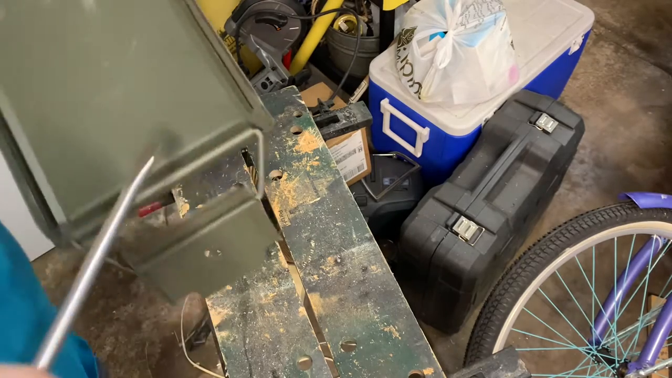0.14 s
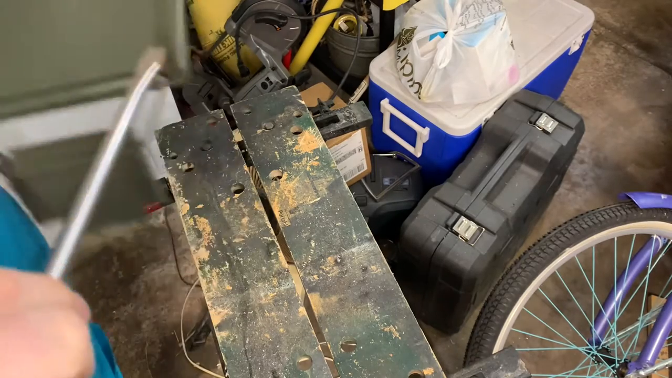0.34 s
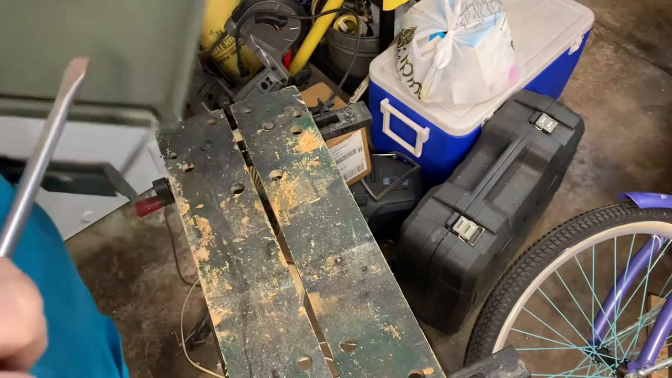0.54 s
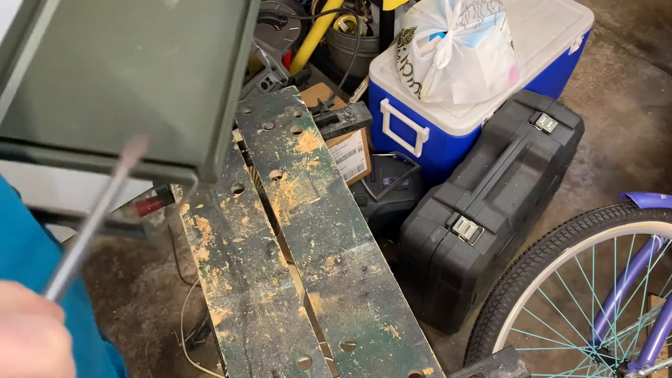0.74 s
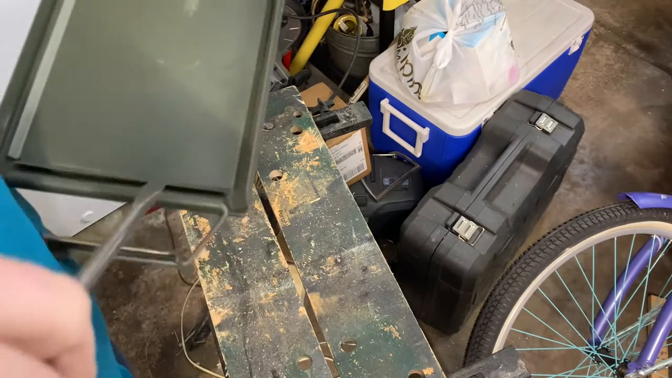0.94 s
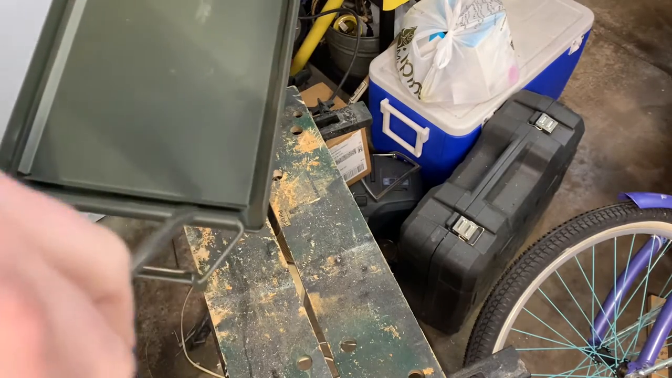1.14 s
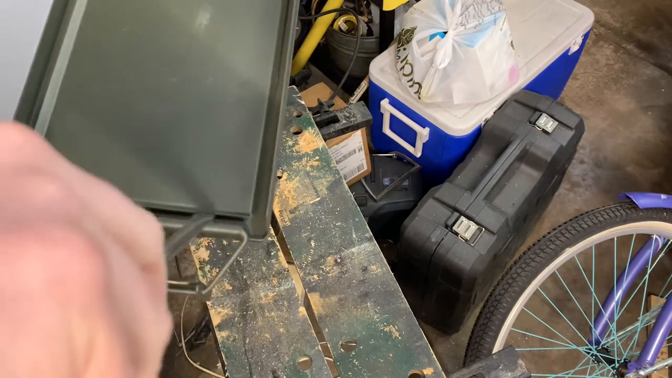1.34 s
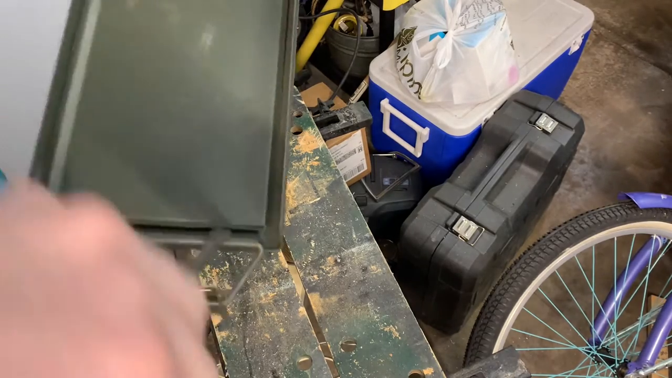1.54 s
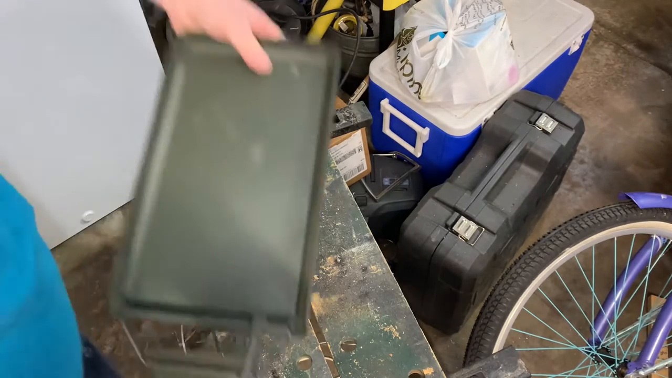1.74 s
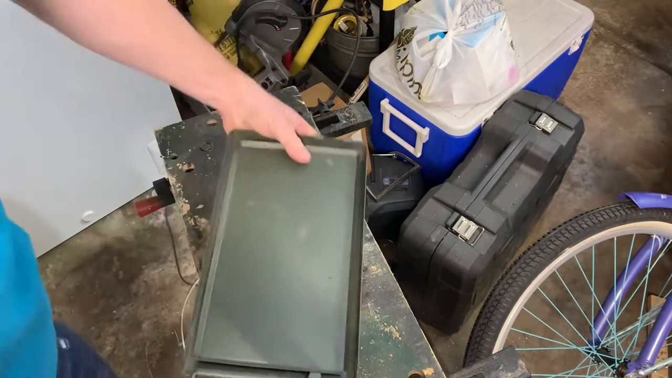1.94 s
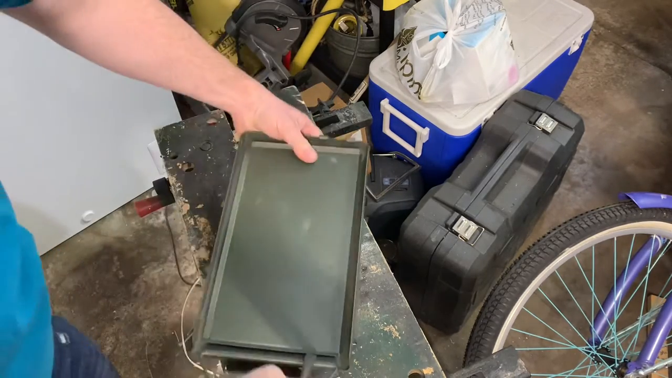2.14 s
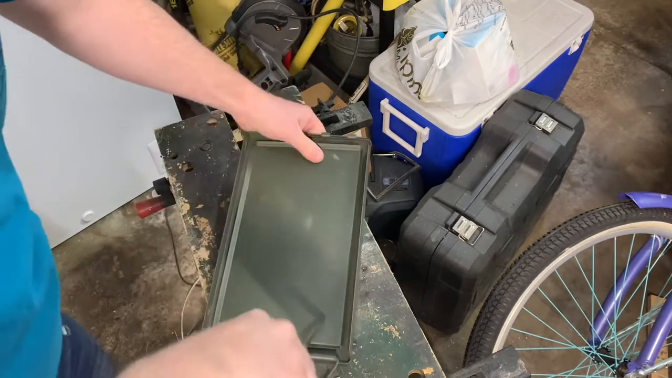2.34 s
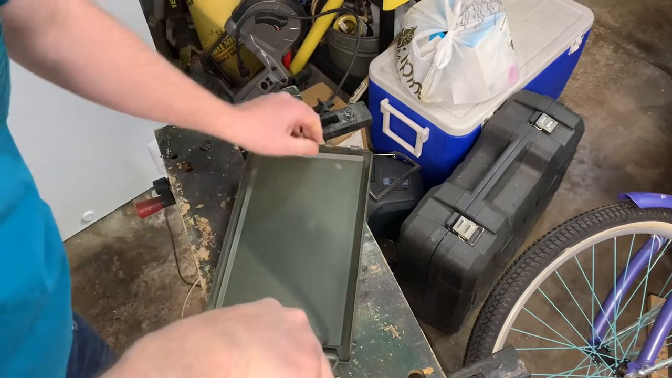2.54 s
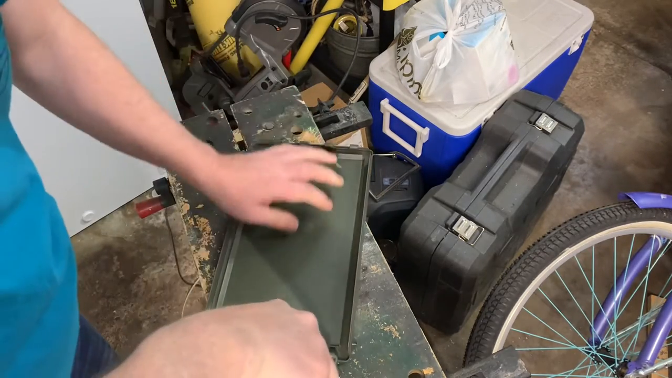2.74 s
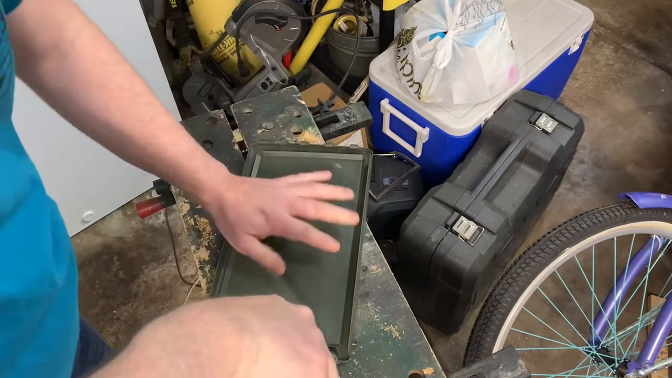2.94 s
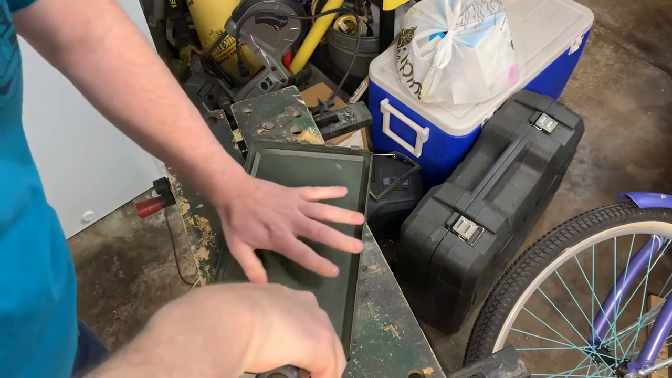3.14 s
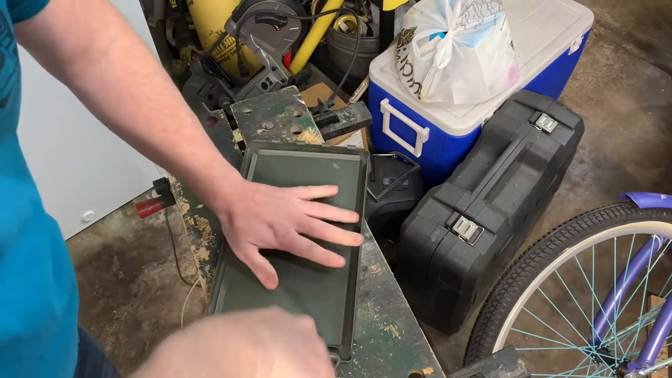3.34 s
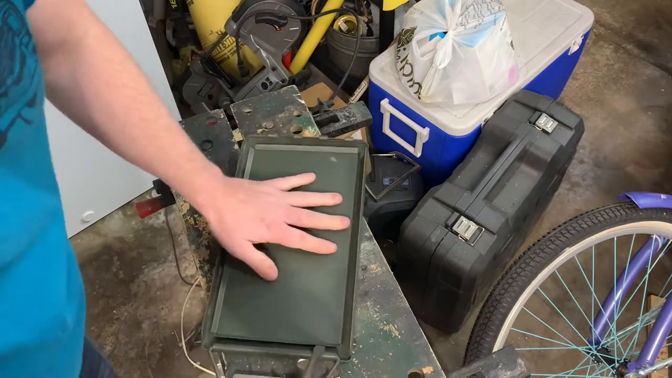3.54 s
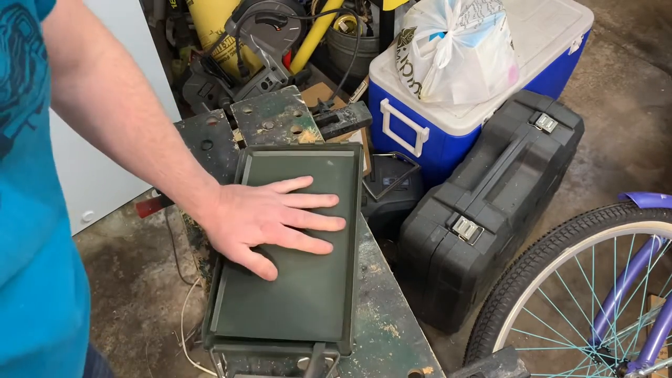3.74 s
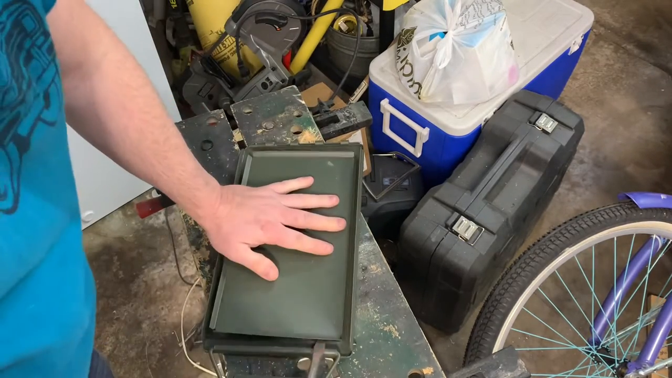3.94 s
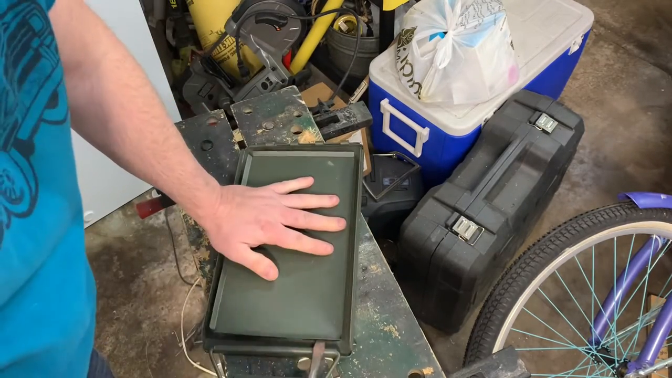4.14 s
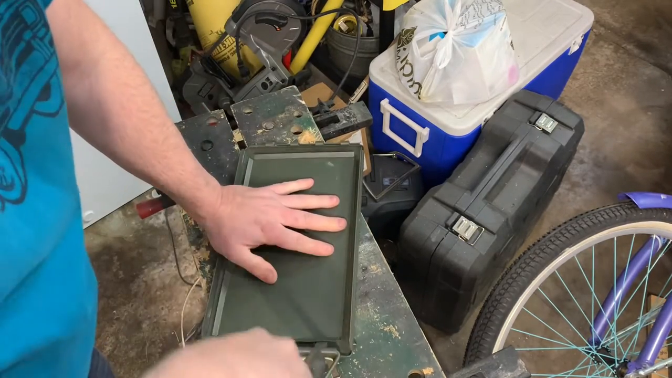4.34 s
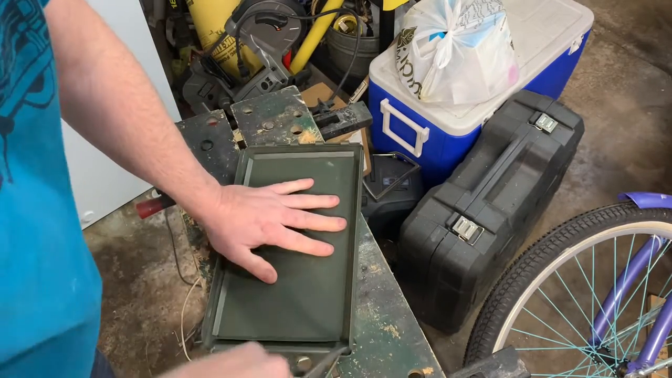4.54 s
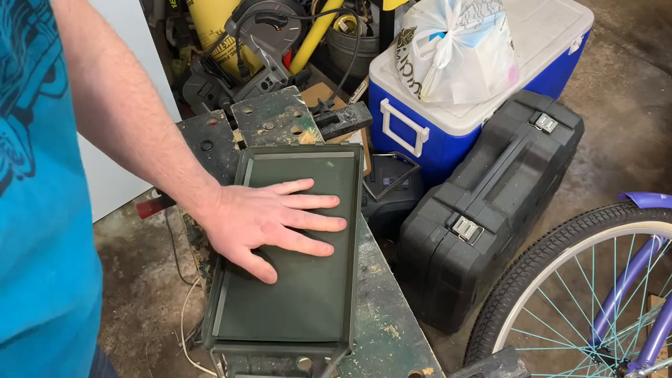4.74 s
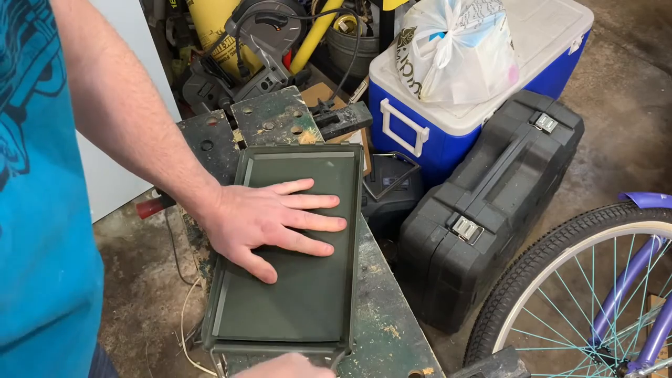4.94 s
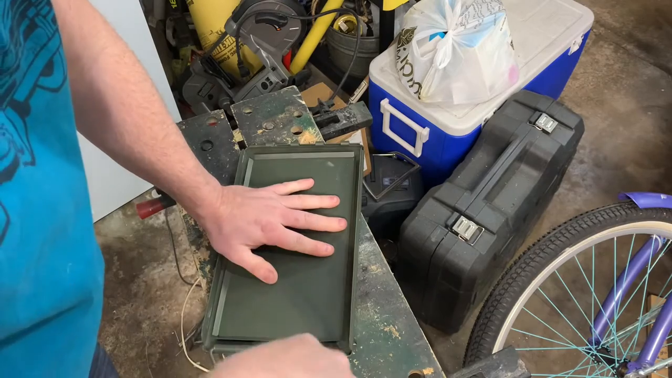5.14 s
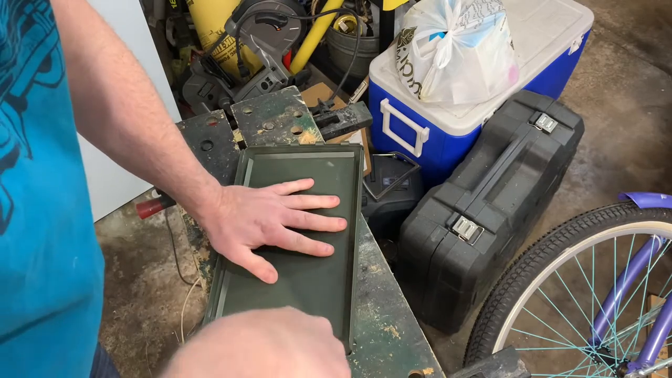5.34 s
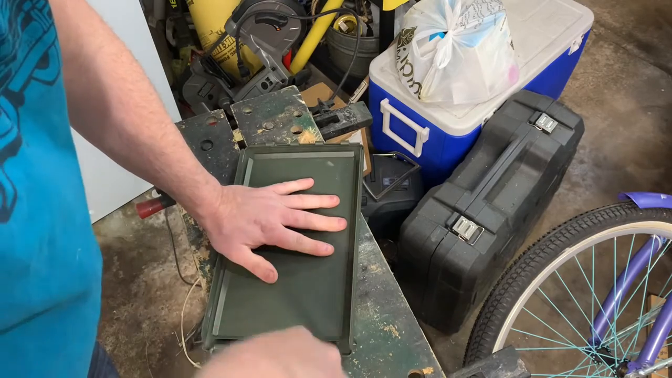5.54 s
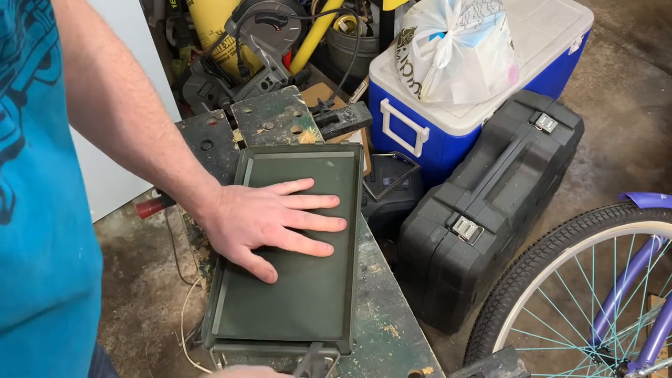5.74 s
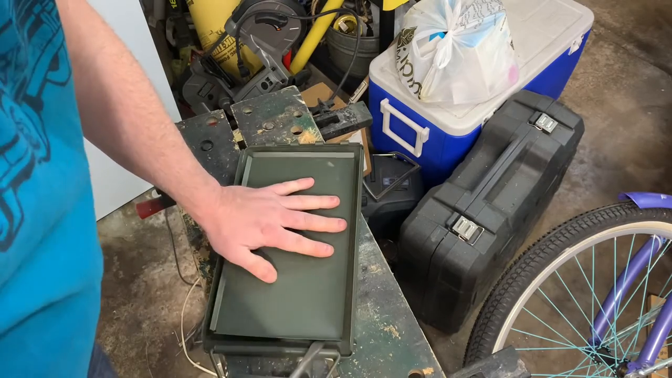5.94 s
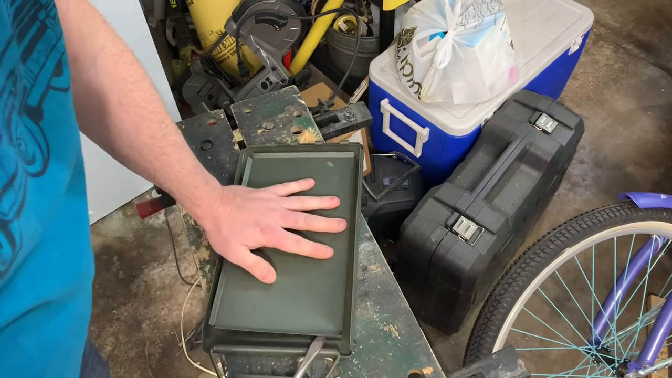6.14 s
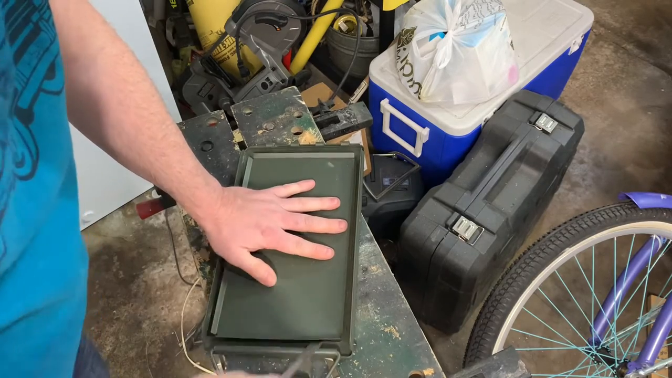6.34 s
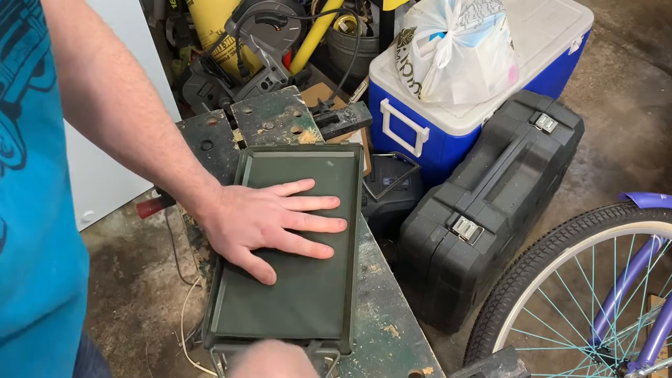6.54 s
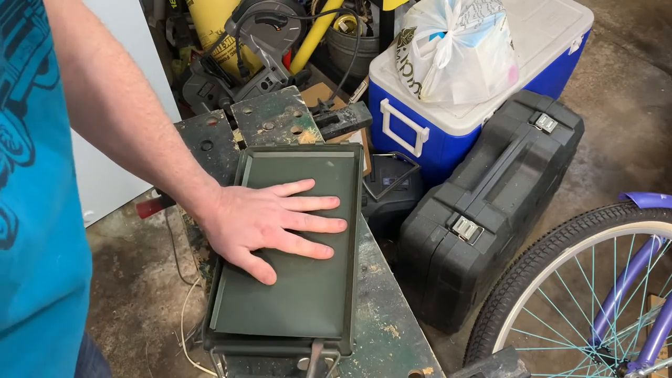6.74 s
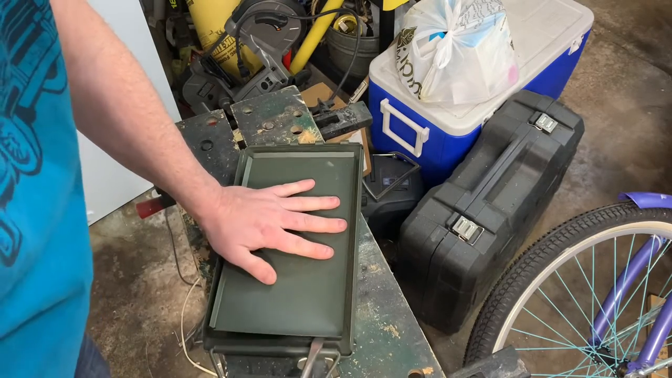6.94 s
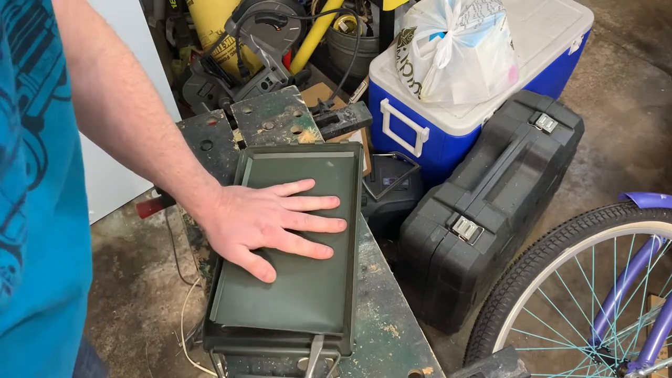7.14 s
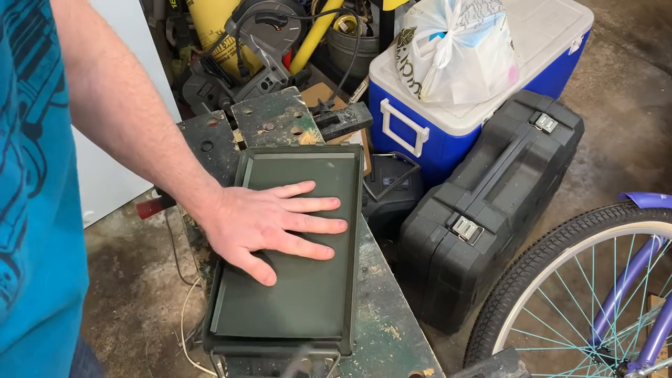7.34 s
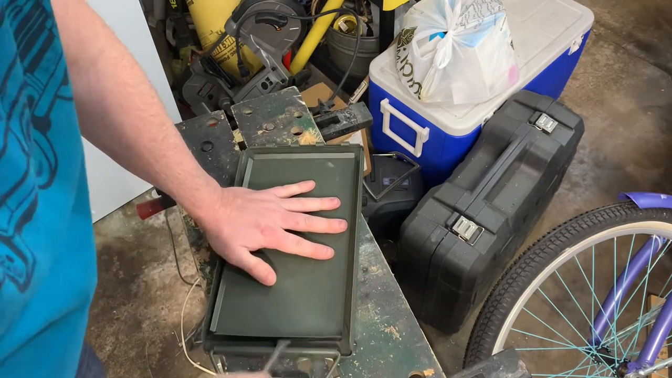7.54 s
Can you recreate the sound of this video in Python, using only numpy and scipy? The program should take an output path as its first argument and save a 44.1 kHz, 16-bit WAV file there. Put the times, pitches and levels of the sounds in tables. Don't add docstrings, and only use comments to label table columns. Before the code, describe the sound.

Faint taps of a blade on a carried metal lid, then a bright clatter as it is set on a wooden workbench and the loose plate rocks and rings. A palm damps it; prying brings abrupt hollow clanks with short rattles and quiet gaps. Close handheld stereo pickup, short garage tail, very faint hum and hiss.

```python
import sys
import numpy as np
from scipy import signal
from scipy.fft import rfft, irfft, next_fast_len
from scipy.io import wavfile
from scipy.ndimage import uniform_filter1d

SR = 44100
rng = np.random.default_rng(int(sys.argv[2]) if len(sys.argv) > 2 else 0)


def dump(signal):
    limited = np.clip(np.atleast_2d(signal).T, -1, 1)
    pcm = np.round(limited * 32767).astype(np.int16)
    wavfile.write(sys.argv[1], SR, pcm)


def voltage_ratio(level):
    return 10 ** (np.asarray(level, float) / 20)


N = 334278
MIDDLING_DB = -24


def evened(x):
    return x / np.sqrt(np.mean(x ** 2) + 1e-20)


def read(points, hz, axis=1):
    points = np.transpose(points)
    return np.interp(np.log(hz + 1), np.log(points[0] + 1), points[axis])


def add(mix, start_s, sound):
    part = mix[round(start_s * SR):][:len(sound)]
    part += sound[:len(part)]


def smooth_noise(count, size):
    once = uniform_filter1d(rng.standard_normal(count), size=size)
    return evened(uniform_filter1d(once, size=size))


def air():
    # frequency in Hz, level in dB per Hz.
    air_spectrum = [(12, -35), (20, -5), (130, -2.5), (154, -20.5), (187, -12), (1710, -37.5),
                    (3950, -44.5), (4940, -36), (5380, -53.5), (7520, -41), (8650, -43), (11100, -39.5),
                    (16000, -39)]
    # frequency in Hz, level in dB.
    hum_partials = [(59, -74.5), (118.9, -65)]
    level_db, settle_db_per_s = -60.5, 0.55
    hz, t = np.fft.rfftfreq(N, 1 / SR), np.arange(N) / SR
    white = rfft(rng.standard_normal((2, N)))
    hiss = evened(irfft(white * voltage_ratio(read(air_spectrum, hz)), N))
    once = uniform_filter1d(rng.standard_normal(N), size=1500)
    wander = evened(uniform_filter1d(once, size=1500))
    hum = np.zeros(N)
    for f, db in hum_partials:
        hum += np.sqrt(2) * voltage_ratio(db + 1.5 * wander) * np.sin(2 * np.pi * f * t + .35 * wander)
    swell_db = 1.3 * evened(uniform_filter1d(wander, size=5000))
    return voltage_ratio(-settle_db_per_s * t) * (voltage_ratio(level_db + swell_db) * hiss + hum)


def garage(x, size=256, count=3):
    # frequency in Hz, t60 in seconds, level in dB.
    room_decay = [(100.3, 0.35, 3.5), (500, 0.68, -13), (1100, 0.54, -7.5), (3020, 0.49, -7),
                  (8800, 0.33, -4), (12500, 0.39, -13), (14500, 0.5, -18), (16000, 0.72, -23)]
    turn_per_s = 90
    hz, t, z = signal.stft(rng.standard_normal((SR * 3 // 4, count, 2)).T, SR, nperseg=size)
    shape = voltage_ratio(-60 * t / read(room_decay, hz)[:, None])
    shape *= np.clip(t / 0.0025 - .4, 0, 1)
    energy = (shape ** 2).sum(axis=1, keepdims=True) * size / 2
    shape *= voltage_ratio(read(room_decay, hz, axis=2))[:, None] / np.sqrt(energy)
    tails = signal.istft(z * shape, SR, nperseg=size)[1]
    wobble = evened(uniform_filter1d(rng.standard_normal(N), size=900))
    turn = np.pi * (turn_per_s * np.cumsum(wobble) / SR + np.arange(count)[:, None] / count)
    fed = x * np.sqrt(2 / count) * np.cos(turn)
    return signal.fftconvolve(fed[None], tails, axes=2).sum(axis=1)[:, :N]


def squeak():
    # time in seconds, frequency in Hz, level in dB.
    whistle = [
        (5.08, 11800, -87),
        (5.2, 12664, -70.5),
        (5.229, 11760, -100),
    ]
    s, hz, db = np.transpose(whistle)
    t, out = np.arange(s[0], s[-1], 1 / SR), np.zeros(N)
    tone = np.sin(2 * np.pi * np.cumsum(np.interp(t, s, hz)) / SR)
    add(out, s[0], 2 * voltage_ratio(np.interp(t, s, db)) * tone * signal.windows.tukey(len(t), .2))
    return out


def scrapes():
    # start in seconds, length in seconds, level in dB, frequency in Hz.
    drags = [(.19, .08, -82, 2065), (.3, 0.062, -69, 2940), (.33, 0.15, -70, 1360), (.34, 0.11, -65, 840),
             (.35, .05, -72, 3750), (1.132, 0.15, -46, 1405), (6.885, 0.046, -69, 2607),
             (7.0, 0.095, -71, 2404), (7.005, .06, -68, 932), (7.17, 0.058, -68, 2530),
             (7.27, 0.041, -46, 985), (7.25, 0.092, -55, 1940)]
    width_share = .1
    out = np.zeros(N)
    for at, length_s, db, hz in drags:
        t = np.arange(0, length_s, 1 / SR)
        a, b = rng.standard_normal((SR // 4, 2))[:len(t)].T
        r = np.exp(-np.pi * width_share * hz / SR)
        rough = signal.lfilter([1], [1, -2 * r, r * r], a + 1j * b)
        band = evened((rough * np.exp(2j * np.pi * hz * t)).real)
        add(out, at, voltage_ratio(db) * band * np.sin(np.pi * (t / length_s) ** 0.32))
    return out


def bench_top(t):
    # frequency in Hz, level in dB against the thud, t60 in seconds.
    bench_modes = [(87, -7.5, 0.063), (137, -12, 0.13), (157.3, -3, 0.079)]
    return sum(voltage_ratio(db - 60 * t / t60) * np.sin(2 * np.pi * hz * t) for hz, db, t60 in bench_modes)


def thumps():
    # start in seconds, level in dB.
    landings = [(1.135, -45.5), (1.264, -57.5), (1.845, -35), (2.129, -33), (2.469, -44), (3.105, -37),
                (3.62, -42), (3.888, -39.5), (4.153, -38), (5.914, -41.5), (7.355, -37.5)]
    t, out = np.arange(SR // 5) / SR, np.zeros(N)
    for at, db in landings:
        add(out, at, voltage_ratio(db) * evened(bench_top(t)) * (1 - np.exp(-t / 0.015)))
    return out


def rim():
    # start in seconds, level in dB, frequency in Hz.
    rim_notes = [(1.1288, -43, 2830), (1.2645, -17, 3840), (1.5514, -34, 3510), (1.8457, -14.5, 3870),
                 (2.1286, -7.5, 2950), (2.1969, -16.5, 2990), (2.2897, -18, 2990), (2.4994, -17, 5550),
                 (2.5354, -20, 5580), (2.6284, -26, 3390), (2.6973, -33, 3350), (2.8499, -20, 2870),
                 (3.103, -25, 2940), (3.4336, -27, 3350), (3.6421, -11, 3040), (3.897, -16, 4600),
                 (4.1694, -7.5, 3590), (4.3465, -19, 3200), (4.3774, -16, 3750), (5.25, -28, 2500),
                 (5.4271, -20, 3870), (5.439, -13, 3770), (5.9222, -15.5, 4140), (6.4218, -30, 2850),
                 (7.3214, -24, 3210), (7.3654, -16, 2730), (7.5323, -16, 4120)]
    trim_db, t60_s = -10.5, 0.11
    t, out = np.arange(SR // 5) / SR, np.zeros(N)
    for (at, db, hz), apart in zip(rim_notes, rng.uniform(.004, 0.013, len(rim_notes))):
        pair = np.sin(2 * np.pi * hz * t) + .6 * np.sin(2 * np.pi * hz * (1 + apart) * t)
        add(out, at, voltage_ratio(db + trim_db - 60 * t / t60_s) * (1 - np.exp(-t / .001)) * pair)
    return out


def pings():
    # start in seconds, level in dB, frequency in Hz, t60 in seconds.
    singing_parts = [(0.319, -57, 11640, 0.14), (2.09, -33, 600, 0.15), (1.28, -28, 1040, 0.1),
                     (1.845, -10.5, 12060, 0.059), (1.9, -37.5, 1000, 0.22), (1.93, -21.5, 7900, 0.093),
                     (2.5, -35.5, 930, 1), (2.481, -40, 1500, 1), (2.49, -53.5, 740, 0.4),
                     (2.55, -46.5, 490, 0.23), (3.104, -22.5, 7660, 0.14), (3.62, -34.5, 556, 0.32),
                     (3.641, -24.5, 7000, 0.12), (3.888, -8.5, 649, 0.038), (5.915, -12, 640, 0.054),
                     (5.915, -14, 786, 0.063), (3.888, -14.5, 790, 0.065), (1.86, -31.5, 850, 0.15),
                     (2.475, -37.5, 1200, 0.27), (5.917, -42.5, 490, 0.08), (5.075, -61, 5200, 0.21),
                     (5.431, -24, 7100, 0.085), (5.89, -58, 2200, 0.13)]
    # start in seconds, level in dB, frequency in Hz.
    low_notes = [(0.437, -36, 1100), (1.552, -46.5, 1120), (1.622, -44, 1065), (1.697, -60, 984),
                 (2.131, -12.5, 1063), (2.194, -24, 972), (2.29, -22, 991), (2.852, -21, 883),
                 (2.854, -19.5, 1396), (3.047, -20, 1042), (3.102, -30, 798), (3.431, -30, 1044),
                 (3.618, -8.5, 837), (3.888, -8, 904), (4.154, -17, 534), (4.161, -1.5, 1496),
                 (4.164, -3.5, 1026), (4.267, -16.5, 1006), (4.377, -2, 926), (4.464, -18, 919),
                 (4.627, -19, 1509), (5.248, -17, 1458), (5.427, -34, 1005), (5.915, -7, 918),
                 (6.312, -15.5, 1047), (6.425, -40, 1047), (6.588, -16, 924), (7.319, -8, 1043),
                 (7.37, -9, 1045), (7.532, -18, 1307)]
    # start in seconds, level in dB, frequency in Hz.
    high_notes = [(0.4359, -54, 2447), (1.2665, -44.5, 3900), (1.6192, -41, 1940), (1.8427, -10.5, 2410),
                  (2.1291, -13.5, 1602), (2.2912, -18.5, 2386), (2.6289, -24.5, 2310),
                  (2.8504, -22.5, 2910), (3.1033, -18, 3020), (3.8866, -11, 1970), (4.1634, -2, 3637),
                  (4.3789, -6.5, 1552), (4.6244, -12, 2074), (4.9926, -31, 1913), (5.251, -10.5, 2362),
                  (5.439, -22, 3810), (6.2801, -39, 1950), (6.4248, -17.5, 2166), (7.1776, -52.5, 2380),
                  (7.3184, -5.5, 2015), (7.3662, -7, 2180), (7.5328, -9, 2020)]
    free_t60_s, held_t60_s, palm_s = 0.23, 0.068, 3.5
    soft_linger = 0.068
    t, out = np.arange(SR // 3) / SR, np.zeros(N)
    shape = (1 - np.exp(-t / 0.00092)) * signal.windows.tukey(len(t), .3) ** (t > t.mean())
    rows = [(at, db + 6.5, hz, t60) for at, db, hz, t60 in singing_parts]
    for table, trim_db in [(low_notes, -5.), (high_notes, -9.)]:
        for at, db, hz in table:
            t60 = free_t60_s if at < palm_s else held_t60_s
            rows.append((at, db + trim_db, hz, t60 * voltage_ratio(soft_linger * (MIDDLING_DB - db))))
    for at, db, hz, t60 in rows:
        flutter = smooth_noise(len(t), 300) * np.minimum(t / .025, 1)
        note = voltage_ratio(3 * flutter) * np.sin(2 * np.pi * hz * t + 1.2 * flutter)
        add(out, at, voltage_ratio(db - 60 * t / t60) * shape * note)
    return out


def sheet(count=800):
    # frequency in Hz, level in dB.
    crowd_strength = [(35, -58), (60, -33.5), (304, -20), (375, -10.5), (453, -10.5), (644, -6.5), (961, 7),
                      (1160, 0.5), (3260, -2.5), (6600, -11.5), (8960, -8.5), (10800, -14), (12700, -18.5),
                      (15400, -18.5), (16500, -51)]
    # frequency in Hz, level in dB.
    loud_modes = [(619.1, -50), (786.0, -55.5), (942.1, -43), (1292, -39.5), (1459, -41.5), (2008, -53.5),
                  (2729, -72.5), (2955, -78), (3591, -44), (3946, -44), (5227, -58), (5550, -56.5),
                  (6654, -58), (7090, -52.5), (7569, -52), (8064, -65.5), (10627, -93), (10837, -49),
                  (12037, -72.5), (12317, -67.5), (15337, -63)]
    # frequency in Hz, t60 in seconds.
    ring_time = [(100, 0.13), (500, 0.15), (1000, 0.095), (3000, 0.079), (8000, 0.047), (16000, 0.053)]
    band_edges_hz = [500, 1600, 6000]
    centres_hz = [300, 950, 2800, 9500]
    crowd_hz = 100 + 16700 * ((np.arange(count) + rng.random(count)) / count) ** 1.5
    loud_hz, loud_db = np.transpose(loud_modes)
    hz = np.r_[crowd_hz, loud_hz]
    spacing = np.sqrt(np.gradient(uniform_filter1d(crowd_hz, size=9)).clip(1))
    crowd = evened(spacing * voltage_ratio(read(crowd_strength, crowd_hz)))
    strength = np.r_[crowd, voltage_ratio(5.5) * evened(voltage_ratio(loud_db))]
    power = np.bincount(np.digitize(hz, band_edges_hz), strength ** 2) / 2
    blend = np.array([read(np.c_[centres_hz, one], hz) for one in np.eye(len(centres_hz))])
    strength /= np.exp(np.log(power) @ blend / 2)
    t = np.arange(SR // 5) / SR
    t60 = read(ring_time, hz) * voltage_ratio(rng.standard_normal(len(hz)))
    t60[count:] *= np.where(loud_hz < 3000, 2.1, 1.2)
    turns = hz[:, None] * t + rng.random((len(hz), 1))
    decay = np.exp(np.float32(-np.log(1000) * t / t60[:, None]))
    rings = np.sin(np.float32(2 * np.pi * turns)) * decay
    return rings, strength, blend


def strokes(rings, strength, blend, per_s=900, count=4):
    # time of most pressure in seconds, pressure in dB, build-up in seconds,
    # let-go in seconds, tinkle in dB against the pressure.
    slides = [(4.17, -18, 0.0091, 0.062, -7), (1.841, -24.5, 0.023, .006, -28), (.6, -71, 0.14, 0.27, -7),
              (.338, -49.5, 0.11, 0.17, 0), (.5, -55.5, 0.026, 0.37, -2), (.75, -58.5, 0.19, 0.05, -24),
              (1.38, -59, .08, 0.48, 1.5), (2.125, -19.5, 0.069, 0.011, -8.5),
              (2.468, -28.5, 0.34, 0.65, -16), (3.41, -35.5, 0.12, 0.015, -4),
              (3.645, -12.5, 0.036, 0.068, -13.5), (5.43, -18.5, 0.043, 0.057, -8.5),
              (5.913, -31, 0.02, 0.008, -29), (6.588, -28.5, 0.07, 0.024, -15),
              (7.31, -35.5, 0.084, 0.0204, 7.5), (7.333, -12.5, 0.021, 0.17, -16),
              (7.538, -21.5, 0.074, 0.044, -4)]
    span_db, rub_db = 32.5, -20
    level = np.zeros((3, N))
    for at, db, build_s, let_go_s, tinkle_db in slides:
        t = np.arange(-build_s, let_go_s, 1 / SR)
        pressure = voltage_ratio(db - span_db * np.where(t < 0, -t / build_s, t / let_go_s))
        for part, part_db in zip(level, [rub_db, 0, tinkle_db]):
            add(part, at - build_s, voltage_ratio(part_db) * pressure)
    force = voltage_ratio(3.5 * np.minimum(rng.exponential(1, N), 3))
    slips = evened(force * (rng.random(N) < per_s / SR))
    spot, out = rng.integers(0, count, N), np.zeros(N)
    t = np.arange(rings.shape[1]) / SR
    for k in range(count):
        shares = np.sign(rng.standard_normal(len(strength))) * strength
        for part, reach in zip(level, [blend[0] ** 2, blend[1] + blend[2], blend[-1] ** 2]):
            ring = (shares * reach) @ rings * voltage_ratio(-300 * t)
            out += signal.oaconvolve(slips * part * (spot == k), ring / np.linalg.norm(ring))[:N]
    return voltage_ratio(-8.0) * out


def touches(chatter_s, lead):
    since = (np.arange(4 * lead) - lead) / SR
    size = (len(chatter_s), len(since))
    contacts = voltage_ratio(5.0 * rng.exponential(1, size).clip(0, 3)) * (rng.random(size) < 900 / SR)
    contacts[:, lead] = voltage_ratio(10.0)
    fade = np.exp(-abs(since) / np.clip(chatter_s, .001, .05)[:, None])
    contacts *= np.where(since < 0, voltage_ratio(-10 + 1790 * since), fade)
    contacts *= rng.choice([-1., 1.], size) / np.linalg.norm(contacts, axis=1)[:, None]
    graze = uniform_filter1d(contacts[:, :lead], size=5)
    spread = rfft(contacts * (since >= 0))
    contacts = irfft(spread / np.sqrt(uniform_filter1d(abs(spread) ** 2, size=21) + 1e-9), len(since))
    contacts[:, :lead] = graze
    return contacts


def knocks(rings, strength, blend, lead=1200):
    # start in seconds, drum (500-1600 Hz) in dB,
    # clang and tinkle in dB against the drum, chatter in seconds.
    carried = [(0.436, -35, -1.5, -10.5, 0.012), (0.909, -58.5, -10, -18, 0.011),
               (0.995, -49, -17, -22, 0.032), (1.091, -58, -5.5, -19, 0.0058),
               (1.131, -28.5, -9, -35, 0.0068), (1.166, -39.5, -2, -8.5, 0.0076),
               (1.264, -17, -8.5, -12.5, 0.0051), (1.48, -38.5, -22.5, -21, 0.023),
               (1.551, -38.5, -6, 5.5, 0.0017), (1.622, -41, -1.5, -18.5, 0.0021),
               (1.698, -43, -27, -50.5, 0.0053)]
    set_down = [(1.8406, -17.5, -19.5, -28.5, 0.0051), (1.844, -10, -9, 1.5, 0.024),
                (2.104, -38, -0.5, -10, 0.0069), (2.114, -26, 2.5, -14.5, 0.022),
                (2.129, -5, -2.5, -7, 0.005), (2.195, -10, -11, -7, 0.021), (2.291, -16, -2.5, 0.5, 0.015),
                (2.455, -24.5, -6, -6, 0.0046), (2.469, -11, -8, -7.5, 0.068), (2.498, -24.5, 0, 10, 0.02),
                (2.539, -14.5, -11.5, -22, 0.049), (2.631, -32.5, -4.5, -2, 0.0031),
                (2.695, -32.5, 1.5, -13.5, 0.015), (2.849, -14.5, -8, -11, 0.022),
                (3.033, -30, -5, -6, 0.0076), (3.048, -15.5, -16, -17.5, 0.0072),
                (3.06, -23, -7.5, -17.5, 0.014), (3.103, -12.5, -10, -3, 0.058),
                (3.283, -24.5, -13, -37, 0.015), (3.399, -34.5, -21, -13, 0.0093),
                (3.431, -26.5, -7, -5.5, 0.011), (3.438, -29.5, -5, 3, 0.0039),
                (3.602, -41.5, -0.5, -11.5, 0.006)]
    pried = [(3.618, -11, -21, -22.5, 0.013), (3.64, -26, 10, -0.5, 0.025), (3.888, 1, -23, -31, 0.0037),
             (3.897, -5, -9.5, -9, 0.0046), (4.154, -22, -4.5, -20.5, 0.003),
             (4.163, -6.5, -10.5, -14, 0.0057), (4.168, -9, -4, -4, 0.0096),
             (4.266, -18.5, -9.5, -13, 0.0029), (4.332, -18.5, -3.5, -12, 0.03),
             (4.347, -19.5, -1.5, -3, 0.0034), (4.376, -10, -8, -4, 0.0075),
             (4.463, -17.5, -11.5, -40, 0.0012), (4.624, -15.5, -13.5, -16.5, 0.0044)]
    levered = [(4.995, -34.5, 1, -31, 0.052), (5.005, -43, 3.5, -20, 0.01), (5.057, -30, -9.5, -26, 0.003),
               (5.25, -13, -11.5, -15.5, 0.01), (5.412, -34, 5, -4, 0.0087),
               (5.426, -19.5, -2.5, -5.5, 0.0044), (5.438, -20.5, 2, -3.5, 0.006),
               (5.915, 4.5, -21, -28.5, 0.0082), (5.924, -8.5, -5, -7, 0.014),
               (6.278, -36.5, 9.5, -14.5, 0.034), (6.31, -19, -10.5, -21.5, 0.0085),
               (6.424, -17.5, -6, -16, 0.0039), (6.575, -19, -10.5, -21.5, 0.012),
               (6.589, -16, -39, -39, 0.0083), (6.884, -45, -14.5, -30, 0.025),
               (7.001, -53, -11.5, -27, 0.0096), (7.174, -55, -13, -11.5, 0.0069),
               (7.209, -60.5, -3, -11, 0.0063), (7.25, -52, -8, 2.5, 0.0094), (7.266, -46.5, 1, 1, 0.006),
               (7.289, -45.5, 4, 1, 0.0073), (7.317, -24.5, 10, 4, 0.046), (7.322, -24, 5, 2.5, 0.0082),
               (7.366, -14.5, -0.5, -3.5, 0.025), (7.521, -24.5, 2, -14, 0.005),
               (7.533, -22, 5, -10, 0.0064), (7.572, -26, -9, -7, 0.005)]
    thud_db = [-16.5, -21.5, -26.5, -25]
    palm_db_per_s = [36, 6.9, 82, 200]
    trim_db = [5, -11.5, 0.5, 0.5]
    thud_loss = 0.18
    punch_db, punch_s = -2, 0.0041
    bench_most_db = -22
    stages = [carried, set_down, pried, levered]
    counts = [len(rows) for rows in stages]
    s, drum_db, clang_db, tinkle_db, chatter_s = np.concatenate(stages).T
    thud = np.repeat(thud_db, counts) - thud_loss * (drum_db - MIDDLING_DB)
    band_db = drum_db + np.array([thud, 0 * s, clang_db, tinkle_db]) + np.c_[trim_db]
    luck = rng.standard_normal((len(s), len(strength)))
    shares = np.sign(luck) * abs(luck) ** .6 * strength * voltage_ratio(band_db.T @ blend)
    t, out = np.arange(rings.shape[1]) / SR, np.zeros(N)
    rise = 1 - np.exp(-t / 0.00021)
    rise *= 1 + voltage_ratio(punch_db) * np.exp(-t / punch_s)
    bench = bench_top(t) * (1 - np.exp(-t / 0.037))
    noise = np.diff(rng.standard_normal((len(s), len(t) + 1)))
    crack = voltage_ratio(band_db[-1:].T - 20.0 - 1000 * t) * noise
    palm = np.repeat(palm_db_per_s, counts)[:, None]
    sounds = shares @ rings * voltage_ratio(-palm * t) + crack
    for at, sound, touch, db in zip(s, sounds, touches(chatter_s, lead), band_db[0]):
        add(out, at - lead / SR, signal.fftconvolve(sound * rise, touch))
        add(out, at, voltage_ratio(min(db, bench_most_db)) * bench)
    return out


def scene():
    plate = sheet()
    notes = pings()
    near = knocks(*plate) + thumps() + strokes(*plate) + squeak() + scrapes()
    room = garage(near + voltage_ratio(-5) * notes)
    return near + notes + room + air() + rim()


def top_cut(x):
    return signal.sosfilt(signal.butter(12, 16990, fs=SR, output="sos"), x)


def record(dry):
    # frequency in Hz, lead of the right in radians, left over right in dB.
    port_pair = [(60, -.4, -2.6), (250, -.7, -2), (600, -.85, 2.5), (1200, -.6, 2), (1700, 0, 0),
                 (2500, -2, -1), (5200, -2.6, -4.5), (6400, 0, -.5), (8000, 2.8, 0), (8800, 3.5, 0),
                 (11000, 6.28, 0), (12900, 9, 0), (14300, 9.9, 0), (15800, 12.57, 0)]
    # frequency in Hz, side level in dB.
    side_width = [(60, -23.5), (200, -8.5), (500, -1.5), (1500, 4.5), (5000, 1), (6400, 4), (8400, -2.5),
                  (16000, -17)]
    low_edge_hz = 56
    size = next_fast_len(N + SR // 4)
    hz = np.fft.rfftfreq(size, 1 / SR)
    left, right = rfft(dry, size)
    mid = (left + right) / 2
    side = (left - right) / 2 * voltage_ratio(read(side_width, hz))
    side /= 1 + (hz / 7500) ** 8
    tilt = np.exp(.5j * read(port_pair, hz)) / voltage_ratio(read(port_pair, hz, axis=2) / 2)
    edge = 1 / (1 + (hz / 15900) ** 100) * (hz < 16900)
    edge *= hz ** 2 / np.hypot(hz ** 2, low_edge_hz ** 2)
    ports = irfft(np.array([(mid + side) / tilt, (mid - side) * tilt]), size)
    ports = irfft(rfft(np.tanh(ports)) * edge, size)[:, :N]
    return top_cut(ports)


dry = scene()
out = record(dry)
dump(out)
```